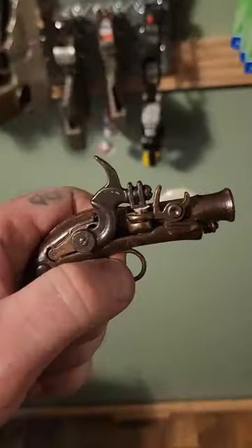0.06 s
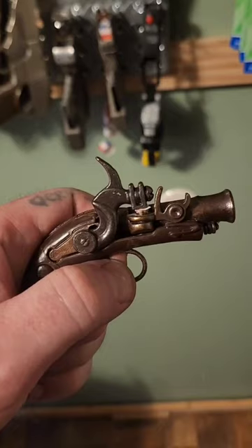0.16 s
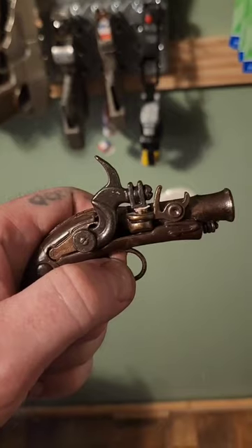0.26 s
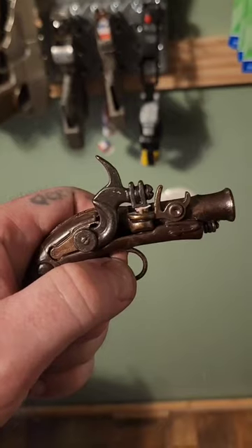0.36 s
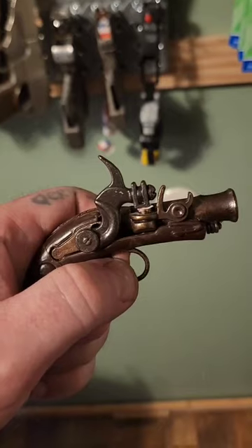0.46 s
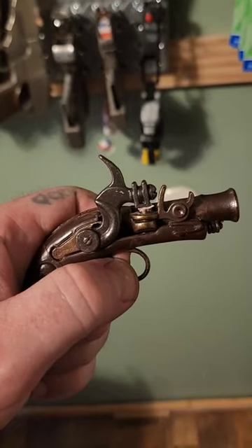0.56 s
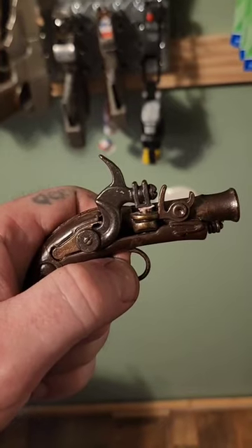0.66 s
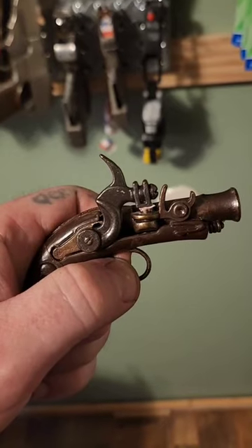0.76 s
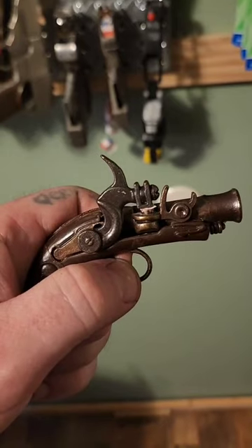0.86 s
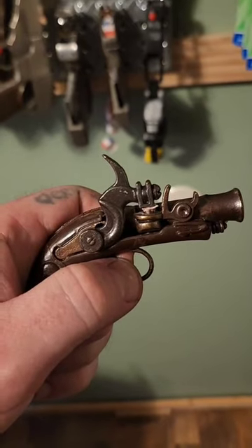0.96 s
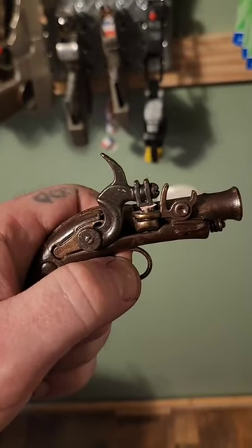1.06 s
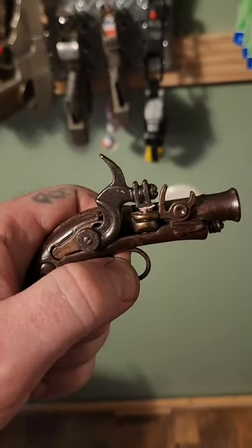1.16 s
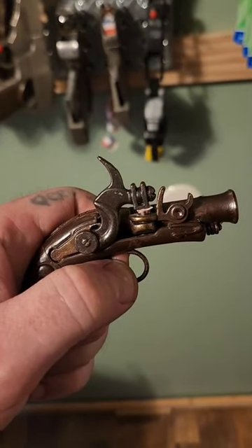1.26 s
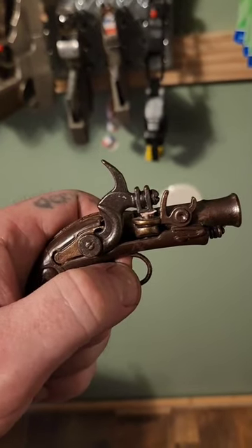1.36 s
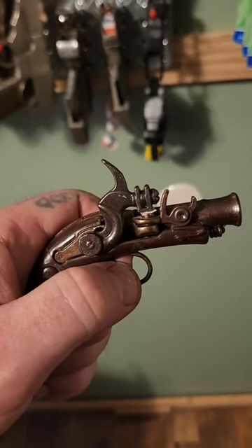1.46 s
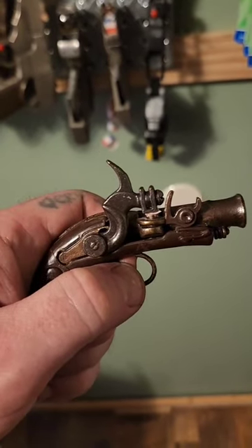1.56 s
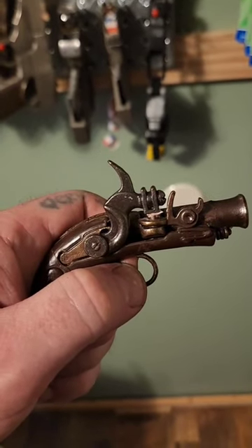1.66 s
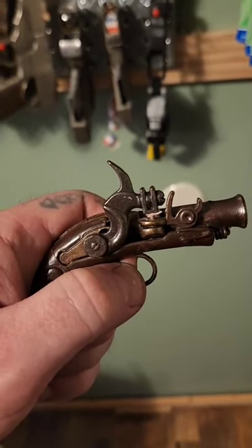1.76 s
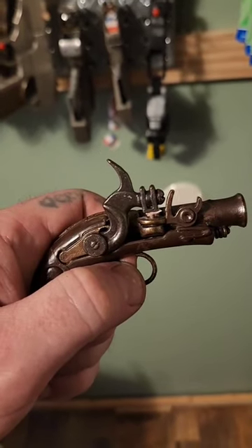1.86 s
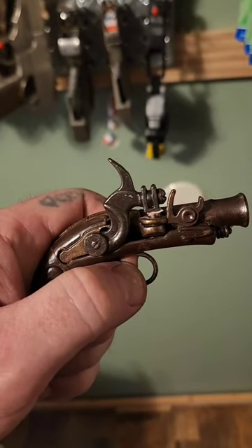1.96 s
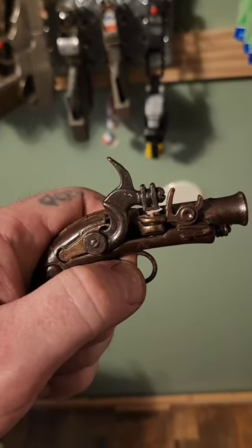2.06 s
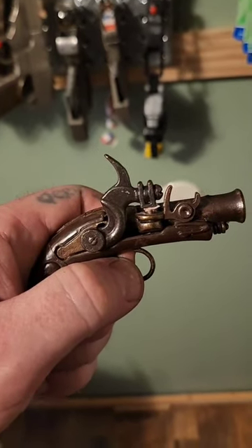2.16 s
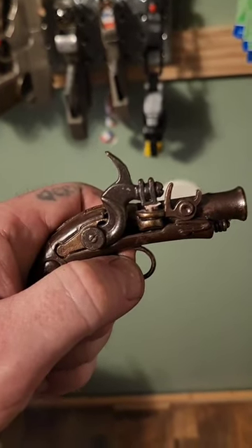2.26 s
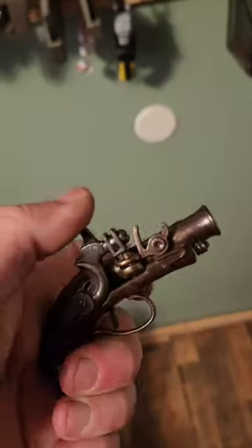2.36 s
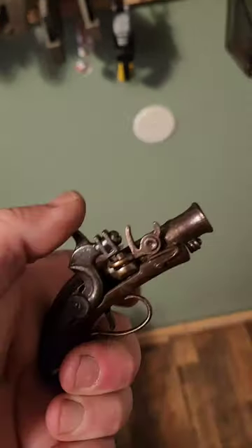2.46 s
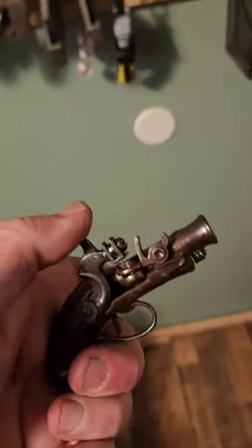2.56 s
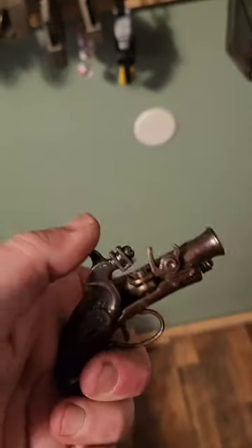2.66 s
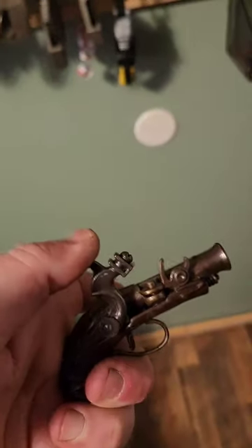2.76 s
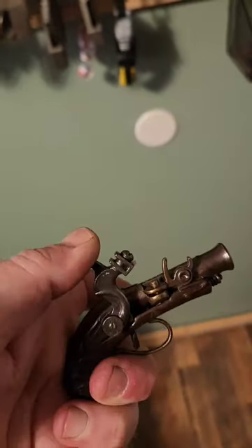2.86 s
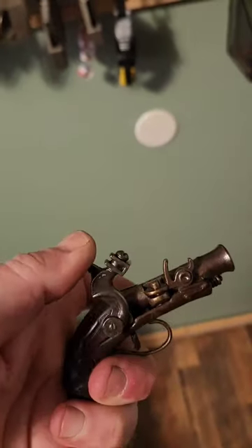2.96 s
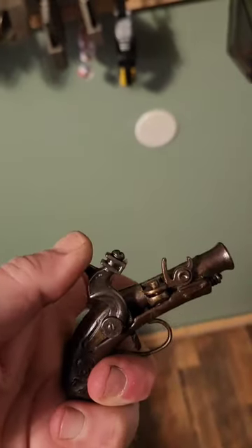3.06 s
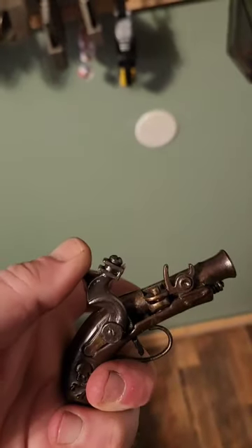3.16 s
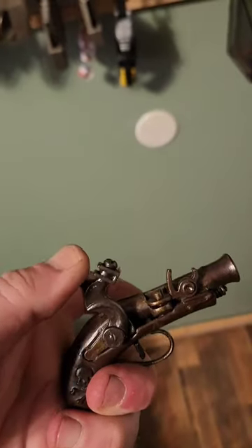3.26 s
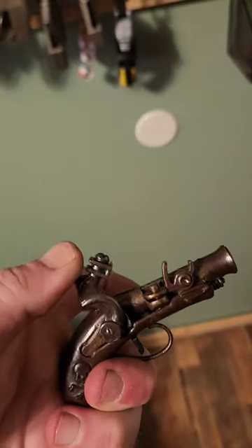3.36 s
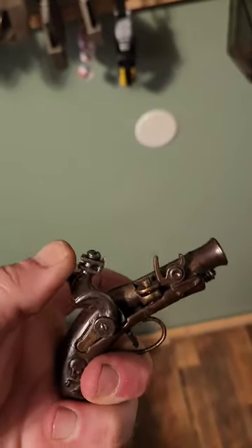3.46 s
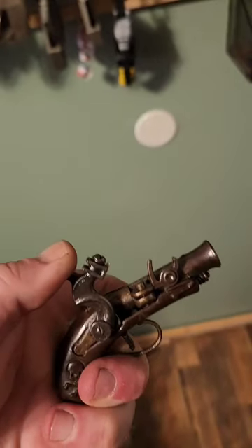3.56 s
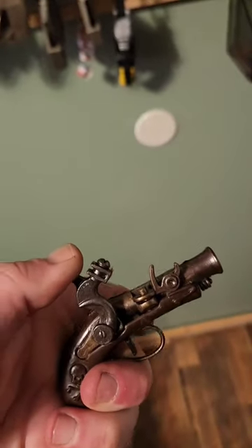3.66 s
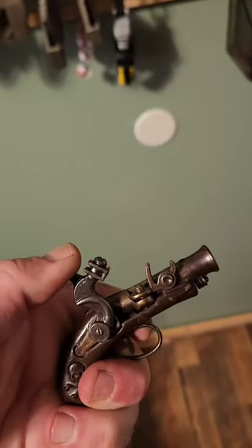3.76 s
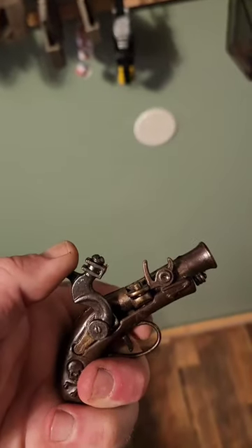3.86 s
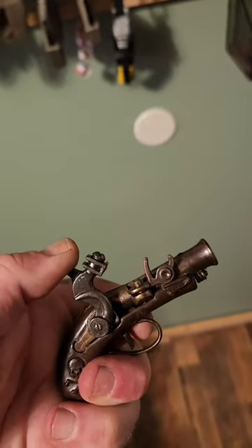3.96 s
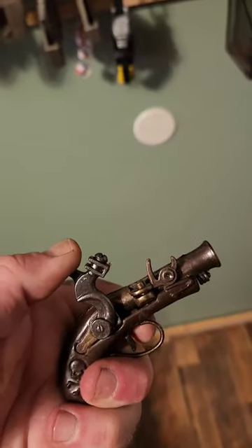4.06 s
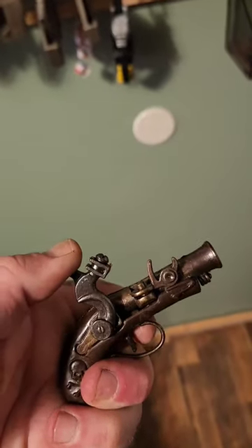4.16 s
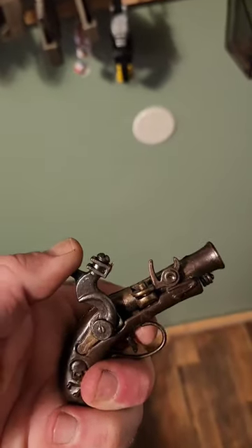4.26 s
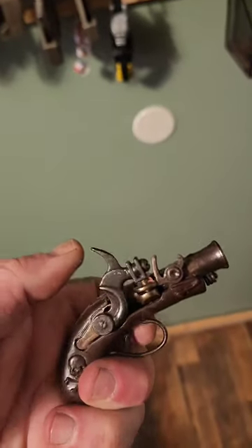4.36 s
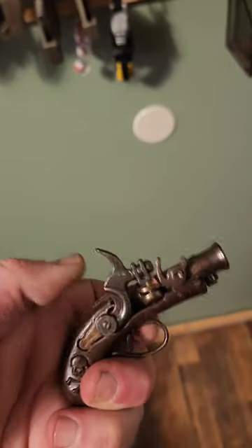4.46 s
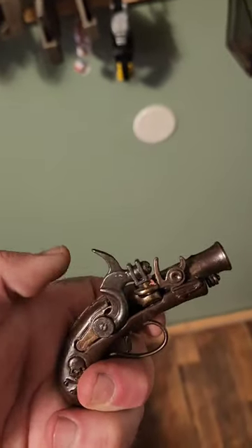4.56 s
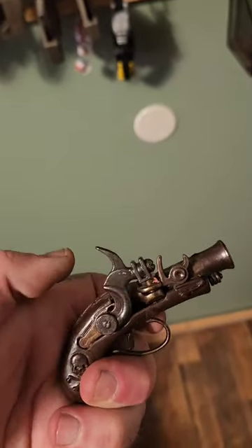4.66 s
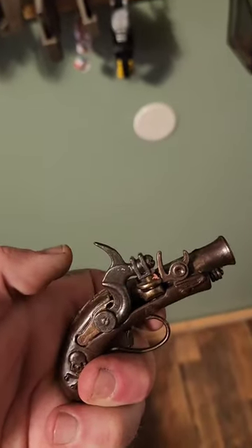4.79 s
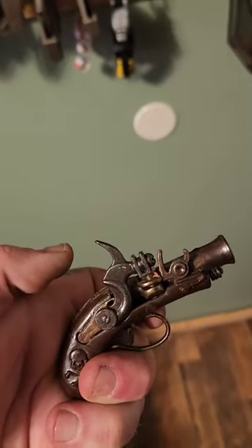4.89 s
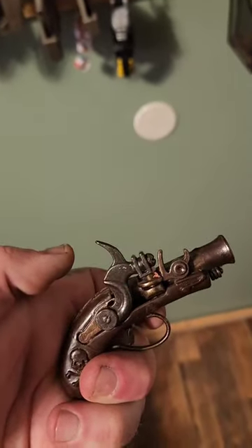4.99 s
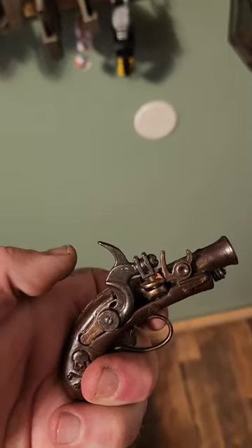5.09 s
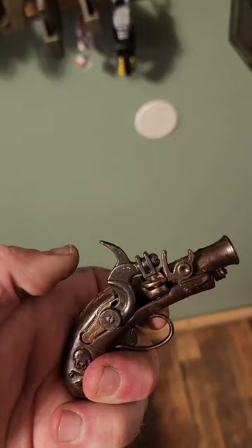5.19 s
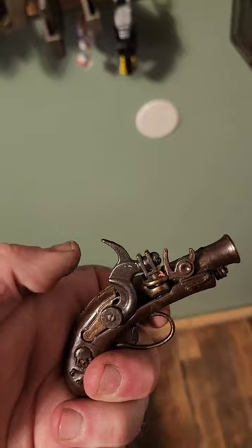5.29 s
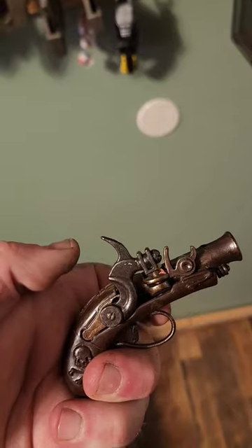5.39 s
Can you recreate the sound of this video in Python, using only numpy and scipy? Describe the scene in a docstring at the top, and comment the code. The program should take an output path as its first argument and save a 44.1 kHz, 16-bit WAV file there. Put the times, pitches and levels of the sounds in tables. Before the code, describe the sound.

Close up in a quiet room with low hum and soft hiss, a miniature cap pistol snaps almost at once, with a harsh crackle on the right and a short bright echo. After a quiet gap, a cluster of tiny metal ticks, one sharper click and a few scattered ones follow as the hammer is worked. Then a second, heavier pop with a low thud and brief room echo fades into faint hiss.

```python
"""In a room with a low hum and soft hiss, a cap goes off, small lock ticks follow, then a second cap goes off.

Each pop is a short burst of clipped noise, followed by echoes made of fading noise whose level sags.
Swelling hiss, ringing thuds and one-sided crackle surround the pops. The ticks are shaken lock resonances.
The room tone is noise in four wavering bands; twice, the tone and ticks briefly drop in level.
"""
import sys
import numpy as np
from scipy import signal
from scipy.fft import rfft, irfft
from scipy.io import wavfile
from scipy.ndimage import uniform_filter1d

SR = 44100
rng = np.random.default_rng(int(sys.argv[2]) if len(sys.argv) > 2 else 0)


def inscribe(sig):
    """Save sig as 16-bit PCM at rate SR to the path in sys.argv[1].

    A 1-D sig is mono; a 2-D sig holds one channel per row.
    Samples are clipped to [-1, 1] before scaling.
    """
    pcm = np.round(np.clip(np.atleast_2d(sig).T, -1, 1) * 32767)
    wavfile.write(sys.argv[1], SR, pcm.astype(np.int16))


N = 239440
SIDES = np.array([[1], [-1]])  # left, right: signs for sharing out a left-right difference


def from_db(db):
    """Turn decibels into a plain multiplier."""
    return 10 ** (np.asarray(db) / 20)


def both_sides(left_db, right_db):
    """Multipliers for the left and right sides."""
    return from_db([[left_db], [right_db]])


def rms_one(x):
    """Scale a sound to an average strength (RMS) of 1."""
    return x / np.sqrt(np.mean(x ** 2) + 1e-20)


def in_time(rows, t):
    """Draw straight lines between a table's rows, column by column."""
    s, *columns = np.transpose(rows)
    return np.array([np.interp(t, s, column) for column in columns])


def at_hz(points, hz):
    """Read a curve at any pitch, with pitch on a logarithmic scale."""
    point_hz, value = np.array(points).T
    return np.interp(np.log(hz), np.log(point_hz), value)


def ring(x, hz, t60):
    """A resonance: a unit click starts a sine of height 1 that falls 60 dB in t60 seconds."""
    radius = from_db(-60 / (t60 * SR))
    angle = 2 * np.pi * hz / SR
    return signal.lfilter([0, np.sin(angle)], [1, -2 * radius * np.cos(angle), radius * radius], x + 1e-18)


# How alike the noise is on the two sides: (frequency [Hz], likeness [-1 to 1])
SIDE_LIKENESS = [(60, 0.75), (180, 0.52), (550, 0.035), (1650, -0.02), (4970, -0.15), (15000, 0.12)]


def coloured(size, spectrum, balance):
    """Stereo noise as a spectrum, alike in the bass and mostly unrelated higher up; also its frequencies."""
    hz = np.maximum(np.fft.rfftfreq(size, 1 / SR), 1)
    mid, side = rfft(rng.standard_normal((2, size)))
    alike = np.clip(at_hz(SIDE_LIKENESS, hz), -1, 1)
    both = np.sqrt(1 + alike) * mid + np.sqrt(1 - alike) * side * SIDES
    return hz, both * from_db(at_hz(spectrum, hz) + at_hz(balance, hz) / 2 * SIDES)


# Room tone, one row a stretch, before the hum peaks, creep shares and wavering:
# (start [s], hum [dB], middle [dB], hiss [dB], top [dB], left-right of all but hum [dB],
#  creep [dB], creep time [s])
TONE_STRETCHES = [(0, -69.5, -71.5, -73.5, -79, -4.5, 1.5, .3), (.3, -69, -78, -80, -88.5, -5, 11.5, 2.5),
                  (2.62, -60.5, -66, -70, -77.5, 3, -6, 0.73), (4.55, -70.5, -77, -79, -86, -4, 4.5, 1.46)]
# Share of the creep that each band takes: (hum, middle, hiss, top) [factor]
CREEP_SHARE = [.4, .8, 1.1, 1.701]
WAVER_DB, WAVER_HZ = [2.5, .8, 0.69, .8], 3  # waver strength in the same four bands; two random points a cycle


def tone_levels():
    """Each stretch creeps towards a new level while every band wavers by itself; also the balance."""
    t, rows = np.arange(N) / SR, np.array(TONE_STRETCHES)
    stretch = np.searchsorted(rows[1:, 0], t)
    start, *levels_db, pan_db, creep_db, creep_s = rows[stretch].T
    crept_db = creep_db * (1 - np.exp(-abs(t - start) / creep_s))
    knots = np.arange(0, t[-1] + 1, .5 / WAVER_HZ)
    random_rows = rng.standard_normal((4, 200))[:, :len(knots)]
    wavers = [np.interp(t, knots, row) for row in random_rows]
    bands = zip(levels_db, CREEP_SHARE, WAVER_DB, wavers)
    return [db + share * crept_db + depth * waver for db, share, depth, waver in bands], pan_db


# Colour of the room tone, relative within each band: (frequency [Hz], level [dB per Hz])
TONE_COLOUR = [(15, -15.5), (30, -9.5), (58, -1), (80, -8), (120, -24), (160, -16), (300, -25.5),
               (480, -21.5), (900, -27.5), (2500, -33.5), (5500, -39.5), (9500, -48.5), (12500, -40),
               (15500, -45.5)]
# Narrow hums: (frequency [Hz], width [Hz], level against the band's noise [dB])
TONE_HUMS = [(59, 9.2, -0.5), (225.5, 23, -8), (370.4, 12, -16.5), (418, 36, -7.5), (503, 10, -9.5)]
# Balance of the room tone: (frequency [Hz], left-right [dB])
TONE_BALANCE = [(50, -1.5), (300, -0.5), (2000, -2.5), (6000, -3), (9000, 5.5), (13000, 4.5)]
TONE_EDGES_HZ = [0, 130, 1000, 8000, SR]  # edges of hum, middle, hiss and top


def room_tone():
    """Four noise bands follow their own levels; narrow noise makes a few low hums stand out."""
    levels_db, pan_db = tone_levels()
    hz, noise = coloured(N, TONE_COLOUR, TONE_BALANCE)
    out = 0
    for low, high, level_db in zip(TONE_EDGES_HZ, TONE_EDGES_HZ[1:], levels_db):
        band = rms_one(irfft(noise * (hz >= low) * (hz < high), N))
        for hum_hz, width_hz, hum_db in TONE_HUMS:
            if low < hum_hz < high:
                t60 = np.log(1000) / (np.pi * width_hz)  # a narrow hum rings for longer
                hum = ring(rng.standard_normal(N), hum_hz, t60)
                band = band + from_db(hum_db) * rms_one(hum)
        out = out + band * from_db(level_db + (low > 0) * pan_db / 2 * SIDES)
    return out


# Brief drops in level: (start [s], end [s], depth before shaping [dB])
DROPOUTS = [(0.211, 0.257, -30), (2.596, 2.651, -21.5)]
DROPOUT_FADE_S = 0.02  # time over which the fade deepens by one full table depth


def dropouts():
    """A multiplier that steps down, sinks until halfway, partly recovers and steps back up."""
    t, gain_db = np.arange(N) / SR, np.zeros(N)
    for start, end, depth_db in DROPOUTS:
        shape = 0.55 + np.minimum(t - start, end - t) / DROPOUT_FADE_S
        gain_db += (t > start) * (t < end) * depth_db * shape
    return uniform_filter1d(from_db(gain_db), size=130)  # soften the steps


# Level after each pop, before the onset and the share per pitch;
# one list per pop: its left row, then its right row:
# (pop time [s], held level [dB], extra dip or rise [dB], its centre after pop [s], its half-width [s],
#  return after pop [s], rise time [s])
SAG_POPS = [
    [(.262, -6.5, 2.5, 0.055, 0.0066, 0.036, .006), (.262, -16.5, -14.5, 0.021, 0.019, 0.039, .008)],
    [(4.52, -11, -21, .045, .015, .075, .012), (4.52, -37, -25, .046, 0.013, 0.078, .009)],
]
SAG_ONSET_S = .004  # the first instant is held down less


def sag(start, t):
    """Level change of both sides in dB, t seconds after start; zero far from a pop."""
    out = np.zeros((2, len(t)))
    for rows in SAG_POPS:
        for side, (pop_s, held_db, dip_db, deepest, width, back, rise) in enumerate(rows):
            after = start + t - pop_s
            onset = 1 - .5 * np.exp(-abs(after) / SAG_ONSET_S)
            held = onset * (1 - np.tanh((after - back) / rise)) / 2
            dip = np.exp(-((after - deepest) / width) ** 2)
            out[side] += (after > -.01) * (held_db * held + dip_db * dip)
    return out


# Echo colour, relative: (frequency [Hz], level [dB per Hz])
ECHO_COLOUR = [(20, -10), (100, -3.5), (150, -27), (300, -17.5), (500, -14.5), (1100, -13.5), (2000, -11.5),
               (3500, -9), (5500, -7.5), (7600, -4.5), (8800, -10.5), (10500, -12.5), (13000, -6),
               (15500, -14)]
# Echo balance: (frequency [Hz], left-right [dB])
ECHO_BALANCE = [(60, -7.5), (200, -5.5), (500, 4), (1300, 3.5), (3000, 2), (6000, 1), (8000, 2),
                (9500, 5.5), (12500, 0.5), (15000, 6)]
# Time for the echo to fall 60 dB, at haste 1: (frequency [Hz], time [s])
ECHO_T60 = [(40, .22), (110, 0.18), (250, 0.32), (700, .2), (2000, .23), (3500, 0.25), (7500, .28),
            (13000, .24)]
# Share of the sag felt at each pitch: (frequency [Hz], left [factor], right [factor])
SAG_SHARE = [(60, .2, .2), (200, 0.2, 0.41), (600, 0.2, .95), (2010, 0.74, 1.05), (8000, 1.05, .95)]
GRIT_DB, GRIT_S = 4.5, .02  # random roughness of the first echoes and how fast it fades


def echoes(start, boom_db=0, body_db=0, middle_db=0, haste=1):
    """Crowded echoes are noise that dies band by band, with any sag in level; above 900 Hz they start rough."""
    t = np.arange(round(.7 * SR)) / SR
    sag_db, out = sag(start, t), 0
    hz, noise = coloured(len(t), ECHO_COLOUR, ECHO_BALANCE)
    shelf_db = np.select([hz < 120, hz < 900, hz < 4500], [boom_db, body_db, middle_db])
    noise = noise / np.std(irfft(noise, len(t))) * from_db(shelf_db)
    lumps = uniform_filter1d(rng.standard_normal((2, len(t))), size=16) * 4
    grit_db = GRIT_DB * np.exp(-t / GRIT_S) * lumps
    share_rows = [(np.log(f), *shares) for f, *shares in SAG_SHARE]
    for centre in 20 * 2 ** (np.arange(21) / 2):  # overlapping bands, half an octave apart
        band_shape = np.clip(1 - 2 * abs(np.log2(hz / centre)), 0, 1)
        band = irfft(noise * band_shape, len(t))
        share = in_time(share_rows, [np.log(centre)])  # here log pitch takes the place of time
        decay_db = -60 * haste * t / at_hz(ECHO_T60, centre)
        out = out + band * from_db(decay_db + share * sag_db + grit_db * (centre > 900))
    return out


# Hammer and trigger ticks:
# (time [s], peak before panning [dB], left-right [dB], struck pitch [Hz], treble drive [dB],
#  top drive [dB], rattle length [s])
TICKS = [(0.182, -60.5, -16, 2600, 4, -2, 0.0008), (2.65, -47.5, -4.5, 2800, -3.5, -7, 0.00096),
         (2.6597, -54.5, -21.5, 2950, -0.5, -18, 0.0026), (2.6736, -48.5, -12, 2690, -3, -29.5, 0.0024),
         (2.681, -51, -3, 3200, -5, -15, 0.003), (2.715, -48, -7, 3500, -9.5, -31, 0.0056),
         (2.754, -46, -8, 3350, -4.5, -16, 0.0019), (2.8013, -44.5, -12, 2900, -7.5, -30, 0.0014),
         (2.812, -43.5, 11, 3180, -2.5, -7, 0.0015), (2.852, -60, -4, 3560, 0, -24.5, 0.00088),
         (3.1099, -26.5, -5.5, 3300, -7.5, -12.5, 0.00013), (3.166, -59, 1, 2190, -13, -20.5, 0.0013),
         (3.281, -36, 5.5, 2910, -6.5, -5.5, 0.0029), (3.7402, -46, 5, 2800, 5, -3, 0.0018),
         (3.782, -54, -10.5, 2950, -10, -25, 0.0017), (3.8364, -41.5, -9, 3130, -9.5, -15, 0.0011),
         (3.921, -63.5, 2.5, 3000, 17, 4, 0.018)]
# Faint ticks while the hand shifts: the same columns without the time
# (peak before panning [dB], left-right [dB], struck pitch [Hz], treble drive [dB], top drive [dB],
#  rattle length [s]; the function sets a shortest length)
FAINT_TICK = (-61.5, -5, 3400, -2, -22, -0.58)
# Resonances of the lock: (frequency [Hz], level before drive [dB], time to fall 60 dB [s])
LOCK_MODES = [(2080, -0.5, 0.0032), (2704, 3.5, 0.006), (3233, -1, 0.0063), (3572, 1, 0.0054),
              (3864, -0.5, 0.00374), (4567, -2.5, 0.00356), (5170, -6, 0.0082), (5432, -3.5, 0.0092),
              (6260, 0, 0.0044), (6790, -4, .008), (7700, -8.5, 0.0043), (9247, 1, 0.0033),
              (12476, 0.5, 0.0018), (14600, -6, .003)]
FAINT_FROM_S, FAINT_TO_S, FAINT_COUNT = 2.685, 2.9, 7
STRUCK_FALL_DB = 19.5  # body modes lose this much drive per octave from the struck pitch
TICK_ECHO_DB, TICK_ECHO_MIDDLE_DB = -27.5, -3.5  # amount sent to the echo; its level from 900 to 4500 Hz
TICK_ECHO_HASTE = 1.6  # the echoes of these close, quiet sounds die sooner


def ticks():
    """Each tick is a brief uneven rattle that sets the lock's modes ringing; the room echoes it faintly."""
    faint = [(s, *FAINT_TICK) for s in rng.uniform(FAINT_FROM_S, FAINT_TO_S, FAINT_COUNT)]
    dry, sent = np.zeros((2, N)), np.zeros(N)
    t = np.arange(3000) / SR
    no_bass = signal.butter(3, 1900, "high", fs=SR, output="sos")
    for s, level_db, pan_db, struck_hz, treble_db, top_db, length in TICKS + faint:
        rattle = np.exp(-(t / max(length, 1e-4) - .6) ** 2)
        contacts = rng.standard_normal(len(t)) ** 3 * rattle  # cubing makes a few knocks stand out
        contacts[0] += .8
        sound = 0
        for k, (hz, mode_db, t60) in enumerate(LOCK_MODES):
            body_db = -STRUCK_FALL_DB * abs(np.log2(hz / struck_hz))
            drive_db = top_db if hz > 8000 else treble_db if hz > 4600 else body_db
            gain = from_db(mode_db + drive_db + rng.normal(0, 2.6))
            sound += (-1) ** k * gain * ring(contacts, hz, t60)
        sound = signal.sosfilt(no_bass, sound)  # a small part radiates no bass
        sound = sound / abs(sound).max() * from_db(level_db)
        at = slice(round(s * SR), round(s * SR) + len(t))
        dry[:, at] += sound * from_db(pan_db / 2 * SIDES)
        # the snap, more than the ring, fills the room
        sent[at] += sound * from_db(TICK_ECHO_DB) * np.exp(-t / max(2 * length, .0008))
    # a start at 1 s is far from both pops, so this echo has no sag
    room = echoes(1, middle_db=TICK_ECHO_MIDDLE_DB, haste=TICK_ECHO_HASTE)
    return dry + signal.fftconvolve(sent[None], room, axes=1)[:, :N]


# Loudest spikes of the crackle: (time [s], peak level [dB])
CRACKLE_SPIKES = [(.2628, -8.5), (.2633, -13.5), (.2685, -14.5), (.2699, -14.5), (.2728, -10),
                  (.274, -12.5), (.2779, -11.5), (.2784, -14.5)]
CRACKLE_FROM_S, CRACKLE_TO_S, CRACKLE_PER_S = .264, .312, 1200  # small random spikes
CRACKLE_DB, CRACKLE_SPREAD_DB = -26, 4  # their typical level and random spread


def crackle():
    """Negative spikes on the right after the first pop, each a fraction of a millisecond wide."""
    s, level_db = np.transpose(CRACKLE_SPIKES)
    t = np.arange(N) / SR
    born = (rng.random(N) < CRACKLE_PER_S / SR) * (t > CRACKLE_FROM_S) * (t < CRACKLE_TO_S)
    spikes = born * from_db(CRACKLE_DB + CRACKLE_SPREAD_DB * rng.standard_normal(N))
    spikes[np.round(s * SR).astype(int)] = from_db(level_db)
    return -np.convolve(spikes, np.hanning(11), "same") * [[0], [1]]


# Low thuds and booms around the pops, levels before smoothing:
# (time [s], frequency [Hz], left [dB], right [dB], time to fall 60 dB [s])
THUDS = [(0.2646, 260, -26.5, -14, 0.0041), (0.269, 30.7, -41.5, -36.5, 0.24),
         (0.277, 68.2, -36, -37.5, 0.27), (.266, 510.6, -38, -38.5, 0.29), (.266, 320, -43.5, -43, 0.16),
         (4.494, 130, -43.5, -28, 0.034), (4.502, 207, -32, -11, 0.081), (4.5105, 125, -17, 0, 0.036),
         (4.5132, 194.5, -30.5, -10, 0.071), (4.5127, 361, -24, -9, 0.058), (4.528, 43.65, -39, -24, 0.2),
         (4.596, 96.7, -47, -37, 0.38)]
OPPOSED_HZ, OPPOSED_T60_S = 250, .1  # higher, shorter thuds push the two sides in opposite directions


def thuds():
    """Each push sets one low resonance ringing, with a soft start."""
    out = np.zeros((2, N))
    for s, hz, left_db, right_db, t60 in THUDS:
        push = np.zeros(N)
        push[round(s * SR)] = -1
        left_sign = -1 if hz > OPPOSED_HZ and t60 < OPPOSED_T60_S else 1
        out += ring(push, hz, t60) * both_sides(left_db, right_db) * [[left_sign], [1]]
    return uniform_filter1d(out, size=40)


# Rise and fall of the hiss, on top of its colour: (time [s], left [dB], right [dB])
SWELL_LEVELS = [(4.487, -66, -66.5), (4.495, -50, -40.5), (4.505, -31.5, -35.5), (4.512, -20.5, -26.5),
                (4.516, -13.5, -24), (4.5195, -32.5, -19.5), (4.523, -50.5, -40.5), (4.532, -51, -48),
                (4.55, -59.5, -50), (4.558, -75.5, -71)]
# Bands that colour the hiss: (frequency [Hz], width of one filter pass [Hz], left [dB], right [dB])
SWELL_BANDS = [(660, 600, -4, 12.5), (2400, 250, 13.5, 0), (3632, 150, -5, 13), (5160, 550, -5.5, 17.5),
               (7540, 500, 0, 11.5), (9600, 3000, 10, -8.5), (12600, 6000, 1.5, -5)]


def swell():
    """Hiss rises into the second pop and lingers faintly; twice-filtered noise gives it metallic bands."""
    t, white = np.arange(N) / SR, rng.standard_normal((2, N))
    hiss = 0.12 * white
    for hz, width_hz, left_db, right_db in SWELL_BANDS:
        b, a = signal.iirpeak(hz, hz / width_hz, fs=SR)
        band = signal.lfilter(b, a, signal.lfilter(b, a, white))
        hiss = hiss + both_sides(left_db, right_db) * band
    sounding = (t > SWELL_LEVELS[0][0]) * (t < SWELL_LEVELS[-1][0])
    return hiss * from_db(in_time(SWELL_LEVELS, t)) * sounding


# Cap pops; the last three columns colour the echo:
# (time [s], burst length [s], burst ceiling left [dB], burst ceiling right [dB], burst upper cut [Hz],
#  echo [dB], boom below 120 Hz [dB], body 120-900 Hz [dB], middle 900-4500 Hz [dB])
CAP_POPS = [(0.2624, 0.0023, -12, -23.5, 7000, -9.5, -3, -4, -1.5),
            (4.52, 0.0028, -12, -6, 4975, -2.5, -1.5, 0, -0.5)]
BURST_LOW_HZ = 890  # lower cut of the burst


def pops():
    """A short harsh burst of squashed noise, and the room answers with echoes."""
    out = np.zeros((2, N))
    for s, length, left_db, right_db, cut_hz, echo_db, *shelves_db in CAP_POPS:
        sound = from_db(echo_db) * echoes(s, *shelves_db)
        t = np.arange(sound.shape[1]) / SR
        b, a = signal.butter(1, [BURST_LOW_HZ, cut_hz], "band", fs=SR)
        dull = signal.lfilter(b, a, rng.standard_normal(sound.shape))
        fade = 1 / (1 + (t / length) ** 8)  # stays up, then falls quickly
        sound += np.tanh(3 * dull) * both_sides(left_db, right_db) * fade
        at = round(s * SR)
        out[:, at:at + len(t)] += sound
    return out


def scene():
    """Add all layers; only the ticks and the room tone pass through the dropouts."""
    background = (ticks() + room_tone()) * dropouts()
    return background + crackle() + thuds() + swell() + pops()


CUTOFF_HZ = 16700  # the sound is cut steeply towards this edge


def record(dry):
    """Peaks are rounded, then the top is cut."""
    rounded = .8 * np.tanh(dry / .8)
    return signal.sosfilt(signal.cheby2(12, 70, CUTOFF_HZ, fs=SR, output="sos"), rounded)


dry = scene()
out = record(dry)
inscribe(out)
```